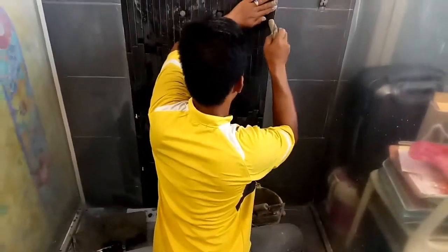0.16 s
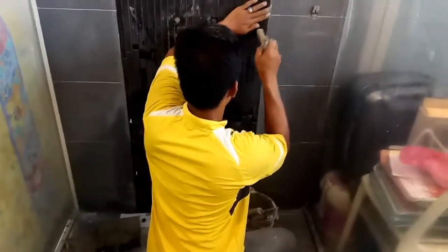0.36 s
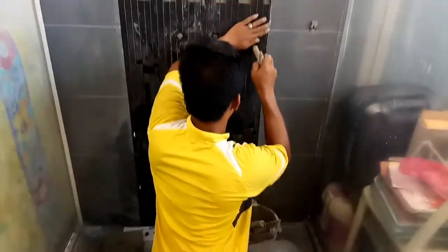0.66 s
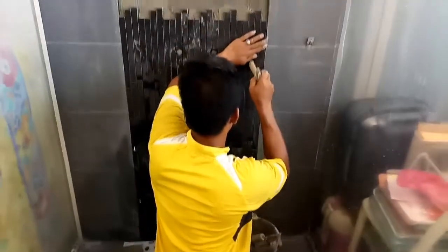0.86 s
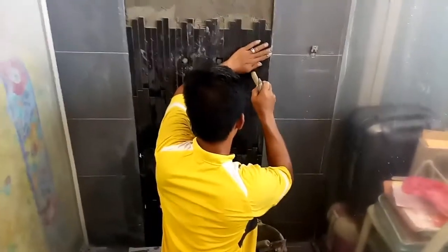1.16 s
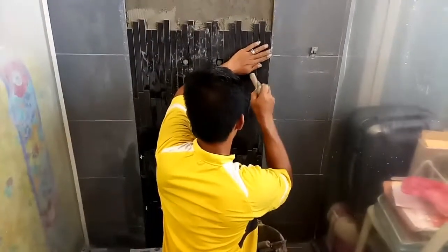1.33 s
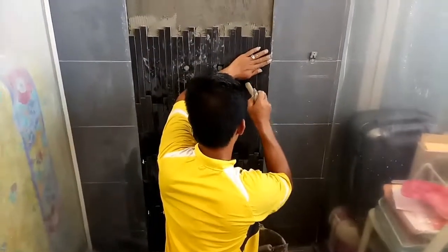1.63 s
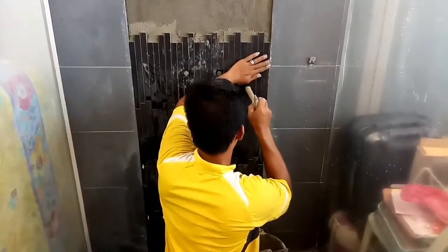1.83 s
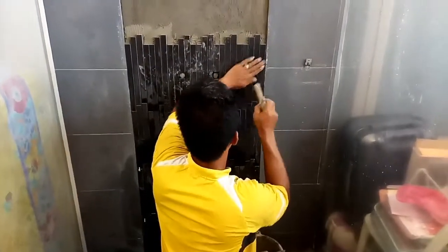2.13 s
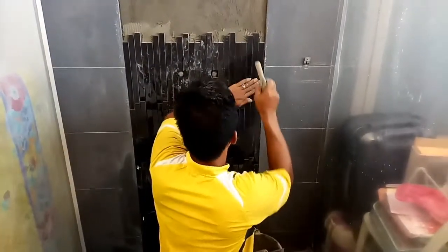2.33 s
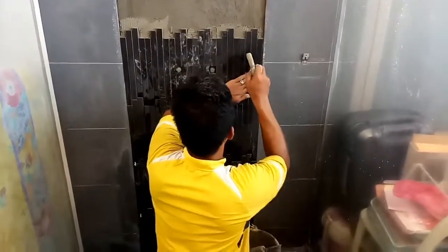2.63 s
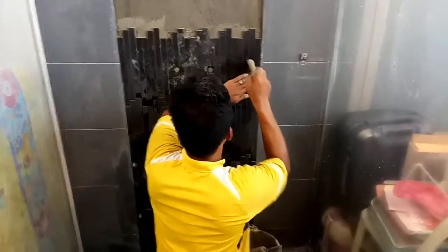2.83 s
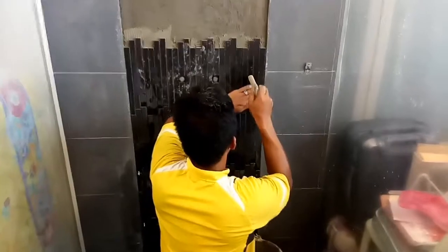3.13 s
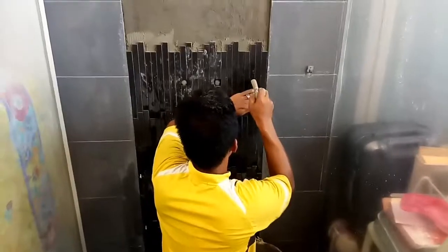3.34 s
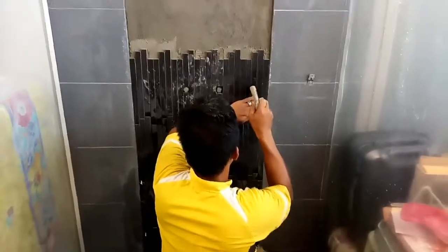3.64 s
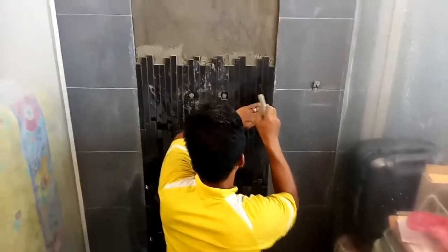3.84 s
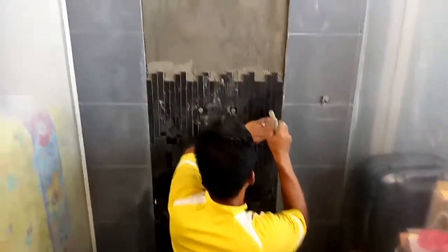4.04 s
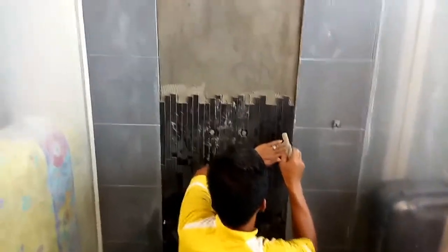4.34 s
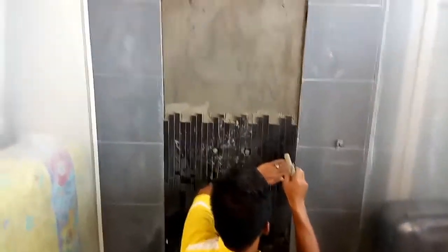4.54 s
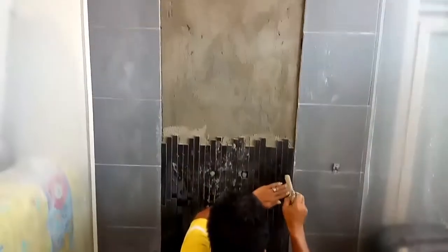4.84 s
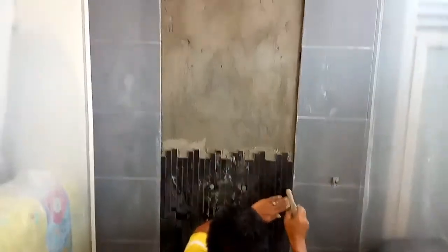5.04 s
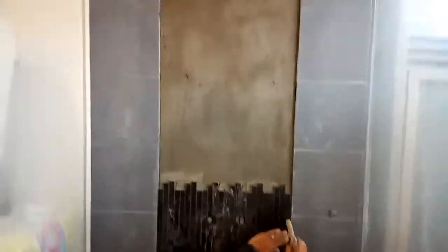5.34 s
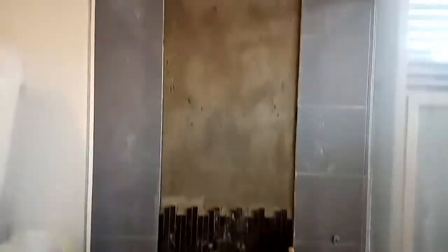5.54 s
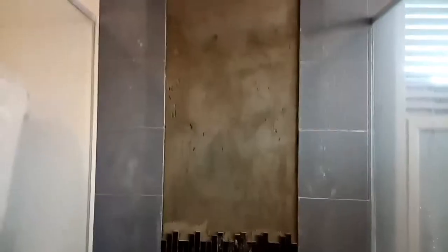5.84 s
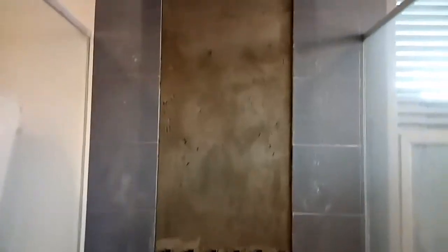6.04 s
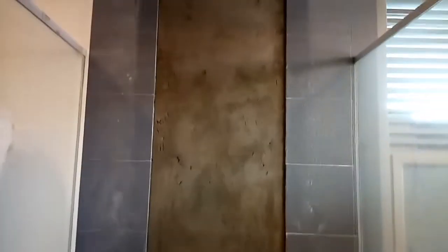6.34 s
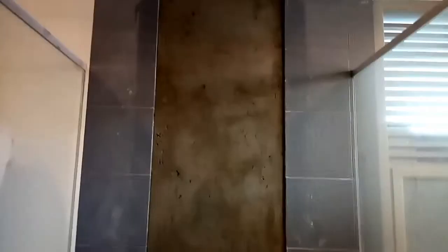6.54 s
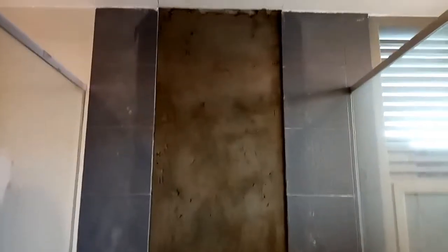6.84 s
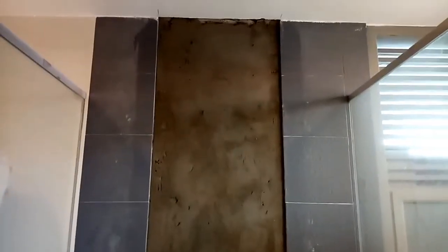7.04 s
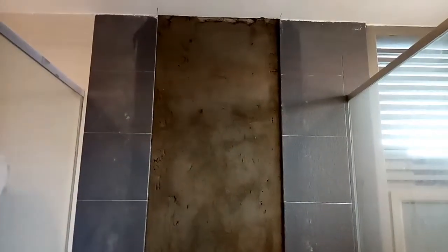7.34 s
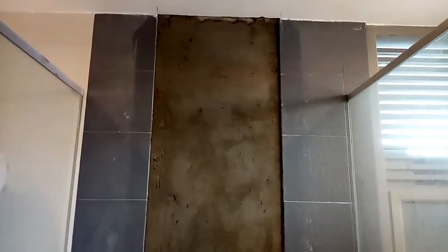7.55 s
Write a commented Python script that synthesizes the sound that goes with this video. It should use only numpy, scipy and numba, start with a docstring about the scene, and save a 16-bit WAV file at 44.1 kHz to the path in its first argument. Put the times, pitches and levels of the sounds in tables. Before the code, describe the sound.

A hand tool taps tiles onto a bathroom wall about four times a second, each hard clack ringing briefly in the small room.

```python
"""A tap already ringing as the sound opens, then an uneven run of taps: a hand tool beds small tiles into
adhesive on the wall of a narrow, hard-walled bathroom. Each blow is stereo noise coloured by crack, tile ring
and wall thud, with a short direct burst, a dense banded tail and decaying sines for the low room modes.
Beneath lie a wavering murmur of shaped noise and, late on, a faint sine tone; short resonant noise bursts
make small ticks and bumps close by. A compressor and a dull-topped microphone finish the sound."""
import sys
import numpy as np
from scipy import signal
from scipy.fft import rfft, irfft, next_fast_len
from scipy.io import wavfile
from scipy.ndimage import uniform_filter1d
from numba import njit

SR = 44100
rng = np.random.default_rng(int(sys.argv[2]) if len(sys.argv) > 2 else 0)


def master_out(mix):
    """Clip the mix to full scale and print it as 16-bit PCM to the path in sys.argv[1]."""
    frames = np.transpose(np.atleast_2d(mix))
    ceiling = np.clip(frames, -1, 1)
    pcm = np.round(ceiling * 32767).astype(np.int16)
    wavfile.write(sys.argv[1], SR, pcm)


N = 338677  # length in samples


def undb(db):
    """Decibels to amplitude gain."""
    return 10 ** (np.asarray(db) / 20)


def on_log(hz, table, column=1):
    """Read a column of a table, whose first column is Hz, along log frequency."""
    table = np.array(table, float)
    log_hz = np.log(np.maximum(hz, 1))
    return np.interp(log_hz, np.log(table[:, 0]), table[:, column])


def decay(t, t60_s, rise_s):
    """Swell with time constant rise_s under an exponential fall of 60 dB per t60_s."""
    return (1 - np.exp(-t / rise_s)) ** 2 * np.exp(-np.log(1000) * t / t60_s)


def resonance(hz, centre_hz, width_hz, order):
    """Bell-shaped response of a damped resonance, 1 at its centre."""
    return 1 / (1 + (2 * (hz - centre_hz) / width_hz) ** order)


# Stereo width across the spectrum: freq_hz, side_minus_mid_db
STEREO_WIDTH = [(60, -12), (100, -9), (170, -12), (300, -31), (500, -0.5), (850, -7.5), (1450, 3),
                (2470, -3), (4210, 1.5), (7160, -3)]
# Stereo balance across the spectrum: freq_hz, left_minus_right_db
STEREO_LEAN = [(60, -8), (100, -6), (170, 1), (300, -6.5), (500, 1.5), (850, -2), (1450, 0), (2470, -5.5),
               (4210, -1.5), (7160, 1.5)]


def stereo_noise(size):
    """Spectra of left and right noise, with likeness and balance set by frequency through mid and side."""
    hz = np.fft.rfftfreq(size, 1 / SR)
    mid, side = rfft(rng.standard_normal((2, size)))
    side = side * undb(on_log(hz, STEREO_WIDTH))
    lean = undb(on_log(hz, STEREO_LEAN) / 2)
    return hz, np.array([(mid + side) * lean, (mid - side) / lean])


def add(out, sound, start_s, pan_db):
    """Mix in a stereo sound; pan_db is left minus right, and anything before time zero is cut off."""
    start = int(start_s * SR)
    pan = undb(np.array([[pan_db], [-pan_db]]) / 2)
    sound = sound[:, max(-start, 0):N - start] * pan
    first = max(start, 0)
    out[:, first:first + sound.shape[1]] += sound


# A middling blow, from which harder and softer ones are reckoned
USUAL_THUD_DB, USUAL_CLACK_DB, USUAL_CRACK_DB = -22, -19, -30
# Boom, knock and treble: level at a middling blow (dB), and dB gained per dB of the part they follow
BOOM_AT_DB, BOOM_PER_THUD, BOOM_PER_CLACK = -33.5, 0.45, -0.12  # blows with less clack boom louder
KNOCK_AT_DB, KNOCK_PER_CLACK, KNOCK_PER_THUD = -26, 0.52, 0.1
TREBLE_AT_DB, TREBLE_PER_CRACK = -58.5, 0.31  # the faint top of the contact crack


def blow_parts(thud_db, clack_db, crack_db):
    """Levels of boom, thud, knock, ring, crack and treble, the unlisted parts following the listed ones."""
    thud = thud_db - USUAL_THUD_DB
    clack = clack_db - USUAL_CLACK_DB
    crack = crack_db - USUAL_CRACK_DB
    boom_db = BOOM_AT_DB + BOOM_PER_THUD * thud + BOOM_PER_CLACK * clack
    knock_db = KNOCK_AT_DB + KNOCK_PER_CLACK * clack + KNOCK_PER_THUD * thud
    treble_db = TREBLE_AT_DB + TREBLE_PER_CRACK * crack
    return boom_db, thud_db, knock_db, clack_db, crack_db, treble_db


# Centres of boom, thud, knock, ring, crack and treble: centre_hz
PART_CENTRES = (150, 320, 1000, 2500, 4800, 11000)


def blow_drive(hz, parts_db):
    """Drive of a blow in dB at any frequency, joined up between its six parts."""
    return on_log(hz, list(zip(PART_CENTRES, parts_db)))


# Colour of a blow as tile, wall and microphone shape it: freq_hz, level_db
BLOW_COLOUR = [(50, -20.5), (90, -21.5), (160, -15), (350, -5.5), (600, 0), (1000, 2.5), (1500, -0.5),
               (2500, 0.5), (3500, 4), (5000, 7), (6300, 8.5), (7300, -2), (8300, 21.5), (15000, 28.5)]
# Rings common to all blows, with peak boosts before scatter: centre_hz, width_hz, boost_db
TILE_RINGS = [(1012, 26, 3), (1096, 230, 1), (1705, 20, -2.5), (2170, 360, 2.5), (4260, 190, 1.5),
              (4700, 260, 0.5)]
TILE_SCATTER_DB = 2.5  # each blow wakes the common rings unevenly
MAIN_RING_WIDTH_HZ, MAIN_RING_DB = 446, 7.5  # its pitch depends on the tile struck


def tile_colour(hz, parts_db, main_ring_hz):
    """Spectrum gain of a struck tile: the drive of the blow lifted by damped tile resonances."""
    colour = undb(on_log(hz, BLOW_COLOUR) + blow_drive(hz, parts_db))
    rings = [(main_ring_hz, MAIN_RING_WIDTH_HZ, MAIN_RING_DB)]
    for centre_hz, width_hz, boost_db in TILE_RINGS:
        rings.append((centre_hz, width_hz, boost_db + TILE_SCATTER_DB * rng.standard_normal()))
    for centre_hz, width_hz, boost_db in rings:
        colour = colour * (1 + (undb(boost_db) - 1) * resonance(hz, centre_hz, width_hz, 2))
    return colour


BLOW_SIZE = 24576  # samples
# Tail of the room: freq_hz, t60_s, rise_s
ROOM_TAIL = [(80, 0.79, 0.013), (210, 0.68, 0.018), (540, 0.34, 0.006), (1470, 0.25, 0.0016),
             (2620, 0.25, 0.0034), (4400, 0.26, 0.00076), (6600, 0.26, 0.00037), (11000, 0.36, 0.00067)]
TAIL_DB, DIRECT_DB, DIRECT_T60_S = 6.5, 7.5, 0.032
LATE_DB, LATE_STRETCH = -39, 10  # a weaker, longer decay from the space beyond the door, relative to the tail


def tap(parts_db, main_ring_hz, hz, echoes):
    """One blow: a short direct crack, then dense reflections that decay band by band."""
    t = np.arange(BLOW_SIZE) / SR
    centres = 60 * 2 ** np.arange(0, 7.9, 0.65)
    # triangular bands that add up to one
    bands = np.array([on_log(hz, list(zip(centres, row))) for row in np.eye(len(centres))])
    t60_s = on_log(centres, ROOM_TAIL)[:, None]
    rise_s = on_log(centres, ROOM_TAIL, column=2)[:, None]
    tail = decay(t, t60_s, rise_s) + undb(LATE_DB) * decay(t, LATE_STRETCH * t60_s, rise_s)
    direct = decay(t, DIRECT_T60_S, 0.0003)
    envelopes = undb(TAIL_DB) * tail + undb(DIRECT_DB) * direct
    # equal energy per octave above 40 Hz, so that the colour reads as heard
    tilt = np.sqrt(4000 / np.maximum(hz, 40))
    spectrum = echoes * tile_colour(hz, parts_db, main_ring_hz) * tilt
    banded = irfft(spectrum[:, None] * bands, BLOW_SIZE)
    return np.sum(banded * envelopes, axis=1)


# Low modes of the room; lobe says whether blow and microphone sit in like (1) or opposite (-1) lobes:
# mode_hz, level_db, t60_s, lobe_sign
ROOM_MODES = [(92.7, -7.5, 0.65, 1), (103.4, -8, 0.14, 1), (121.5, -1, 0.41, -1), (142, -10, 0.9, -1),
              (151.2, -8.5, 0.73, 1), (165.65, 1.5, 0.47, 1), (183.2, -10.5, 0.56, -1),
              (192.1, -5.5, 0.57, -1), (235.7, -14, 1, -1), (256.5, 1.5, 0.3, 1), (265, -10.5, 0.63, -1),
              (279.5, -10, 0.64, 1), (299.2, -6.5, 0.31, 1), (318.2, -4, 0.26, -1), (346.7, -10, 0.27, 1),
              (348.4, -17, 0.54, -1), (362.8, 0, 0.31, -1), (397, -14.5, 0.5, -1), (430, -11, 0.13, -1),
              (434.8, -12, 0.51, -1), (464, -16, 0.41, -1), (492.3, -13, 0.29, -1), (512.8, -12.5, 0.21, 1),
              (537, -22, 0.71, 1), (594, -23, 0.58, -1)]
BOOM_DB, BOOM_RISE_S = 1, 0.0025


def boom(t, parts_db, share_db, skew_rad):
    """The blow sets the room modes going as decaying sines, a little apart in phase left and right."""
    mode_hz, level_db, t60_s, lobe = np.transpose(ROOM_MODES)[:, :, None]
    mode_db = level_db + blow_drive(mode_hz, parts_db) + BOOM_DB + share_db
    envelope = np.sign(lobe) * undb(mode_db) * decay(t, t60_s, BOOM_RISE_S)
    phase = 2 * np.pi * mode_hz * t
    left = np.sum(envelope * np.sin(phase + skew_rad), axis=0)
    right = np.sum(envelope * np.sin(phase - skew_rad), axis=0)
    return np.array([left, right])


# How far a blow repeats the echoes of the last: freq_hz, share (0 to 1)
ECHO_LIKENESS = [(150, .98), (330, .95), (800, .8), (2300, .62), (5000, .5)]
BOOM_SKEW_RAD = 0.2  # spread of the phase skew, added on the left and taken off on the right
BOOM_SCATTER_DB, BOOM_MEMORY = 1.1, 0.969  # fresh drift of each mode per blow, and share of old drift kept
# Blows, with drive levels of wall thud, tile clack and contact crack, and the main tile ring:
# start_s, thud_db, clack_db, crack_db, main_ring_hz
BLOWS = [(-.047, -20.5, -15.5, -35.5, 2640), (0.187, -23, -19, -42.5, 2630),
         (0.452, -22.5, -17.5, -29.5, 3460), (0.68, -23.5, -19.5, -30, 3370),
         (0.904, -25, -27.5, -37, 2400), (1.186, -19, -24, -29, 2540), (1.426, -21, -24.5, -37, 2480),
         (1.661, -19.5, -22, -36, 3140), (1.901, -17.5, -20, -29.5, 2930), (2.489, -22, -15, -25, 1920),
         (2.729, -24, -17.5, -26, 2010), (2.984, -23, -16, -26.5, 1850), (3.235, -19, -16.5, -26.5, 2700),
         (3.472, -20, -16.5, -22.5, 2800), (3.715, -18.5, -16, -25, 2780), (3.968, -21, -17, -32, 2810),
         (4.2, -22, -18.5, -35, 2840), (4.448, -19.5, -15, -26.5, 2840), (4.689, -22, -14.5, -27.5, 2780),
         (4.937, -23, -17.5, -33.5, 2690), (5.167, -27.5, -20, -35.5, 2630),
         (5.411, -23.5, -16.5, -27.5, 2710), (5.642, -26, -16.5, -28, 2670),
         (6.077, -25.5, -20, -32.5, 2550), (6.316, -24.5, -28, -43, 3150), (6.568, -24.5, -34, -48, 3240),
         (6.857, -24.5, -46.5, -53, 1280), (7.122, -22.5, -28.5, -43, 3220), (7.381, -18, -24, -34, 1960)]


def blows():
    """Every blow wakes the same room; its echoes and mode shares drift as the tool moves along the wall."""
    out = np.zeros((2, N))
    t = np.arange(BLOW_SIZE) / SR
    hz, echoes = stereo_noise(BLOW_SIZE)
    alike = on_log(hz, ECHO_LIKENESS)
    per_mode = (len(ROOM_MODES), 1)
    skew_rad = BOOM_SKEW_RAD * rng.standard_normal(per_mode)
    share_db = 0
    for start_s, thud_db, clack_db, crack_db, main_ring_hz in BLOWS:
        parts_db = blow_parts(thud_db, clack_db, crack_db)
        fresh = stereo_noise(BLOW_SIZE)[1]
        echoes = alike * echoes + np.sqrt(1 - alike ** 2) * fresh
        share_db = BOOM_MEMORY * share_db + BOOM_SCATTER_DB * rng.standard_normal(per_mode)
        blow = tap(parts_db, main_ring_hz, hz, echoes) + boom(t, parts_db, share_db, skew_rad)
        add(out, blow, start_s, 0)
    return out


WAVER_DB = 2.2  # spread of the slow wander in level
# Spectrum shape of the murmur, before it is scaled as a whole: freq_hz, relative_db_per_hz
MURMUR_COLOUR = [(40, -22), (156, 4), (242, -7), (344, 0), (511, -18), (1200, -24), (1800, -19),
                 (2500, -23), (6500, -30), (15000, -20)]
MURMUR_DB = -56  # centre of the wavering level


def murmur(waver):
    """Faint murmur of the house: noise shaped by frequency, its level wavering slowly."""
    size = next_fast_len(N)
    hz, noise = stereo_noise(size)
    sound = irfft(noise * undb(on_log(hz, MURMUR_COLOUR)), size)[:, :N]
    return sound / np.std(sound) * undb(MURMUR_DB + WAVER_DB * waver)


# Swell and fade of the thin tone, before its waver: time_s, level_db
THIN_TONE_FADE = [(6.62, -82), (6.75, -70), (7.1, -69), (7.2, -82)]
THIN_HZ = 2325


def thin_tone(waver):
    """A faint steady-pitched sine that comes and goes, wavering twice as deep as the murmur."""
    t = np.arange(N) / SR
    time_s, level_db = np.transpose(THIN_TONE_FADE)
    fade_db = np.interp(t, time_s, level_db, left=-200, right=-200)
    return undb(fade_db + 2 * WAVER_DB * waver) * np.sin(2 * np.pi * THIN_HZ * t)


def room_tone():
    """Murmur and thin tone share one slow random waver, with a new target eight times a second."""
    waver = np.interp(np.arange(N) / SR, np.arange(64) / 8, rng.standard_normal(64))
    return murmur(waver) + thin_tone(waver)


def tick(centre_hz, width_hz, t60_s):
    """A short noise burst in one well-damped resonance, scaled to peak 1."""
    size = 4096
    hz, noise = stereo_noise(size)
    burst = irfft(noise * resonance(hz, centre_hz, width_hz, 4), size)
    burst = burst * decay(np.arange(size) / SR, t60_s, 0.0004)
    return burst / np.abs(burst).max()


# Small ticks and bumps close to the microphone, with peaks before panning:
# start_s, peak_db, centre_hz, width_hz, t60_s, left_minus_right_db
CLOSE_TICKS = [(.412, -26, 3440, 30200, 0.008, -22.5), (1.107, -44.5, 3000, 6000, 0.015, -24),
               (2.166, -42, 3020, 2500, .02, -8), (2.204, -40, 2760, 2500, 0.015, 13),
               (2.702, -40.5, 4000, 8000, 0.012, -25), (3.701, -36, 4000, 8000, 0.013, 6),
               (7.644, -26, 233, 300, 0.013, -10.5)]


def close_ticks():
    """Small resonant ticks and bumps, each placed in time and leaned left or right."""
    out = np.zeros((2, N))
    for start_s, peak_db, centre_hz, width_hz, t60_s, pan_db in CLOSE_TICKS:
        add(out, undb(peak_db) * tick(centre_hz, width_hz, t60_s), start_s, pan_db)
    return out


def scene():
    """Blows, room tone and close ticks together."""
    return blows() + room_tone() + close_ticks()


@njit
def follow(x, release):
    """Peak level: jumps up at once, sinks slowly by the factor release per sample."""
    level, out = 0., np.empty(len(x))
    for i in range(len(x)):
        level = max(x[i], level * release)
        out[i] = level
    return out


LIMIT_DB, RATIO, RELEASE_S = -8.5, 2.9, 0.066  # compressor threshold, ratio, release time constant
MIC_HZ, MIC_ABOVE_DB = 7307, -33  # the microphone falls steeply here; a faint full-band copy passes too
TOP_HZ = 15700


def record(dry):
    """Gain control squeezes loud peaks; the microphone dulls the treble; the top is cut."""
    peak = follow(np.abs(dry).max(axis=0), np.exp(-1 / (RELEASE_S * SR)))
    gain = np.minimum(1, undb(LIMIT_DB) / peak) ** (1 - 1 / max(RATIO, 1))
    sound = dry * uniform_filter1d(gain, size=64)
    mic_filter = signal.cheby1(10, 0.5, MIC_HZ, fs=SR, output="sos")
    sound = signal.sosfilt(mic_filter, sound) + undb(MIC_ABOVE_DB) * sound
    top_cut = signal.ellip(8, 0.2, 60, TOP_HZ, fs=SR, output="sos")
    return signal.sosfilt(top_cut, sound)


dry = scene()
out = record(dry)
master_out(out)
```